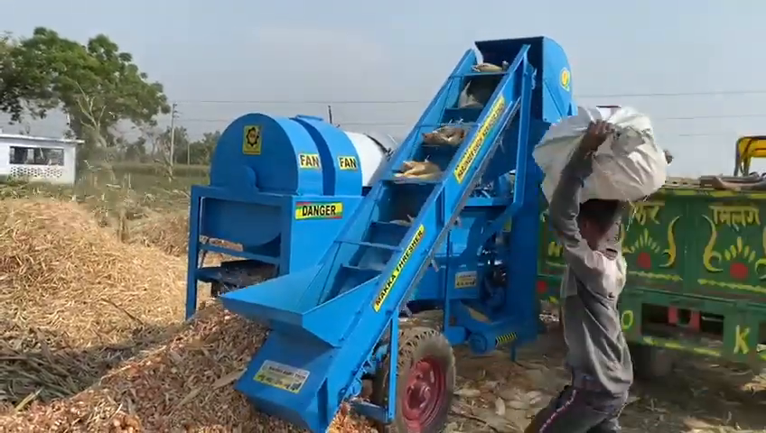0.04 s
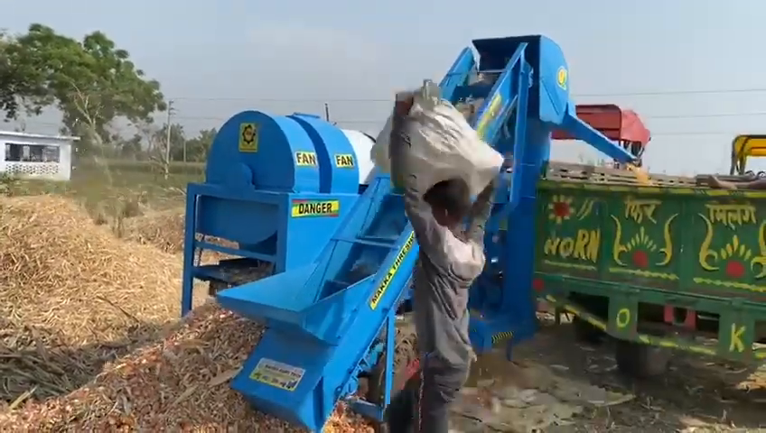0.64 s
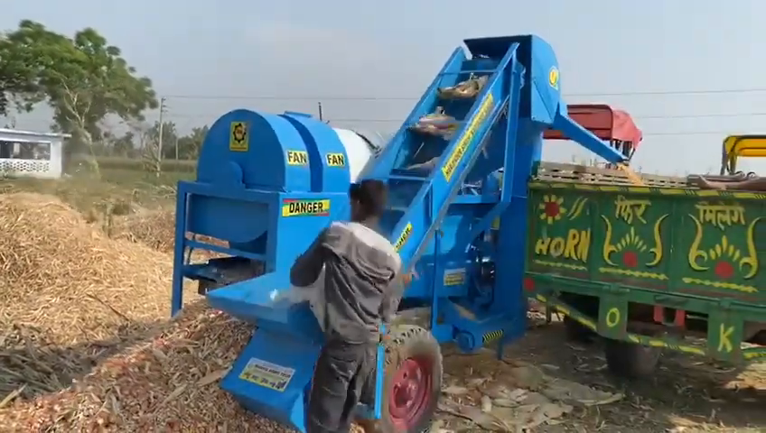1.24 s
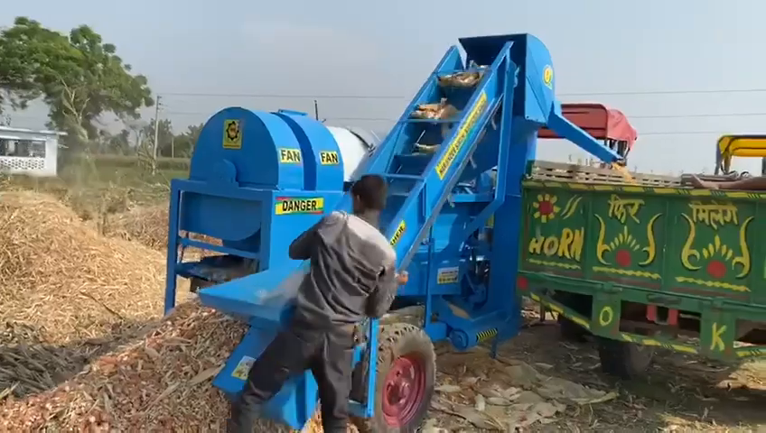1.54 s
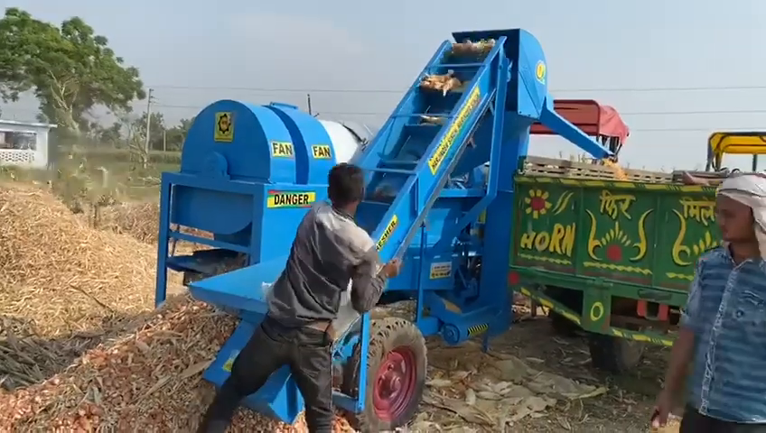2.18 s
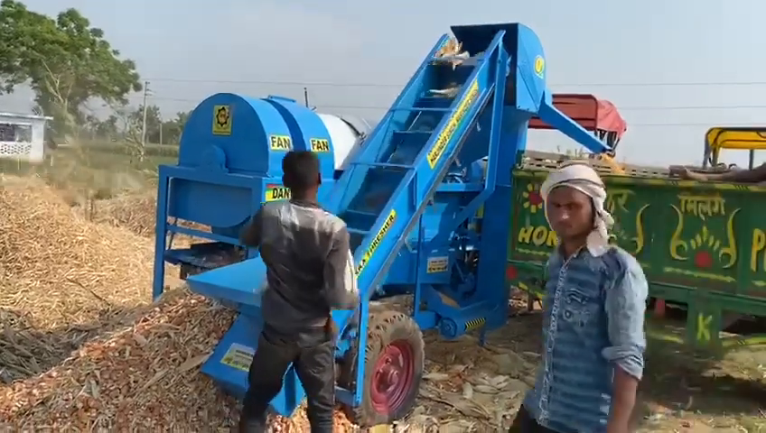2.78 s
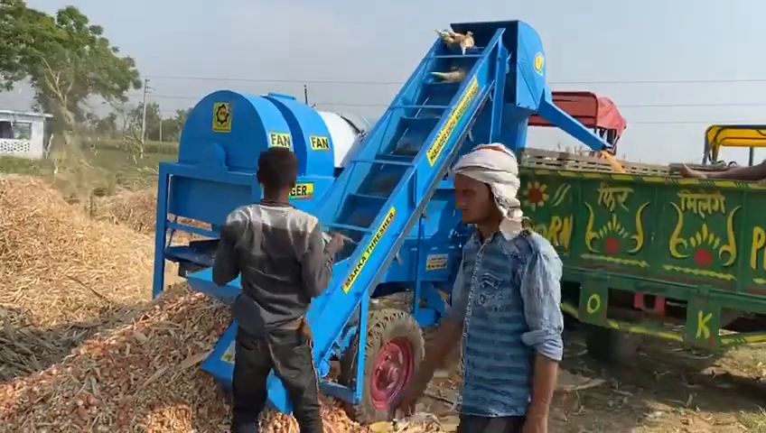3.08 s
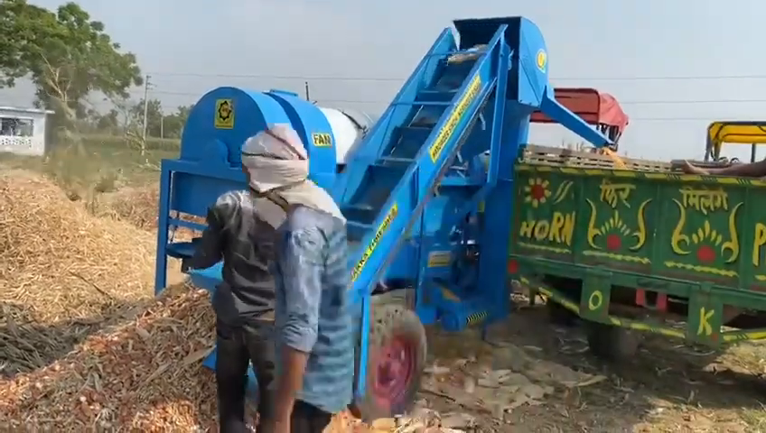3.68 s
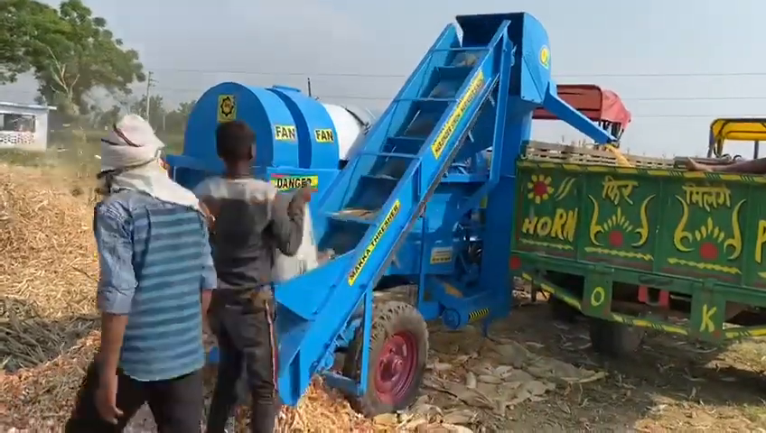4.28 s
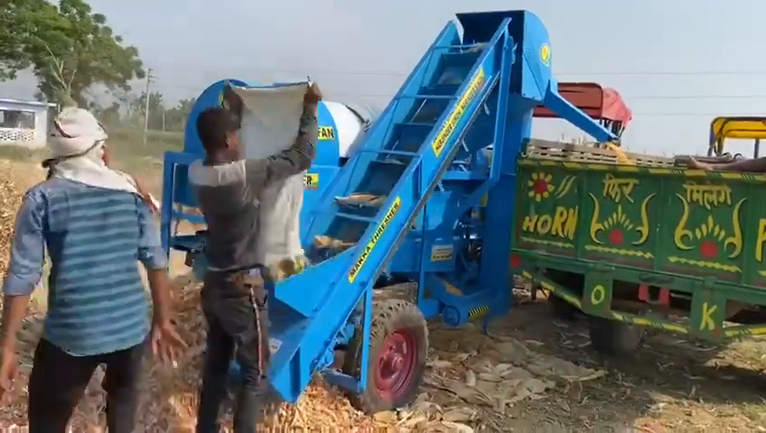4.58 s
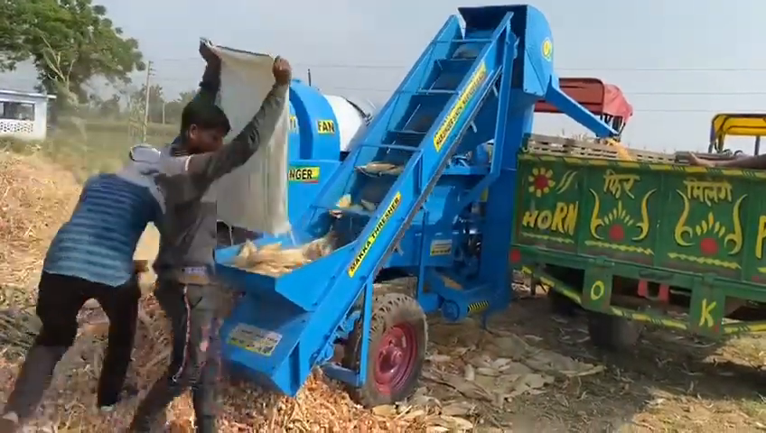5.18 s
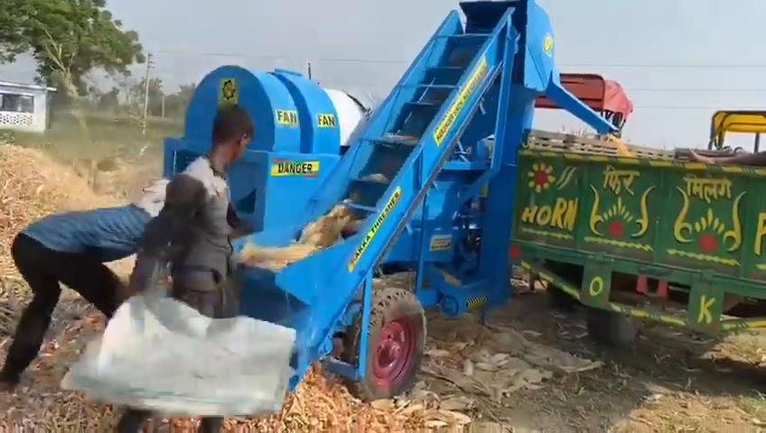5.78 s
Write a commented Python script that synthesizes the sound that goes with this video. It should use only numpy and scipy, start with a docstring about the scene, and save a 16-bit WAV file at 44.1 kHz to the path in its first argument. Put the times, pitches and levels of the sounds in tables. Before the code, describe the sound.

A tractor-driven maize thresher runs loudly and steadily in an open farmyard. Its drum rumbles and throbs over a diesel hum while the fan rushes and drones. Cobs batter the steel casing and kernels hail on the sieves. About a second in, cobs tumble from a sack into the metal hopper. Scattered faint knocks and short dry rustles of sacking and husks come through the roar, which never lets up.

```python
"""A roar with a low throb and a patter of grain: a tractor-driven maize thresher in an open farmyard.
Cobs, tipped in from a sack, batter and ring the sheet-steel casing while the cleaning fan rushes and drones.
The drum rumbles and throbs over the engine's hum.
Loose kernels hail on the sieves among husks, with short dry rustles, mostly of woven sacking."""
import sys
import numpy as np
from scipy import signal
from scipy.fft import rfft, irfft, next_fast_len
from scipy.io import wavfile
from scipy.ndimage import uniform_filter1d, map_coordinates

SR = 44100
rng = np.random.default_rng(int(sys.argv[2]) if len(sys.argv) > 2 else 0)


def generate_wav(signal):
    """Clip the signal to [-1, 1] and save it as 16-bit WAV at the path in sys.argv[1]."""
    frames = np.transpose(np.atleast_2d(signal))
    scaled = np.clip(frames, -1, 1) * 32767
    pcm = np.round(scaled).astype(np.int16)
    wavfile.write(sys.argv[1], SR, pcm)


N = 261513

# modes of the drum's steel wall: (frequency [Hz], level [dB], t60 [s])
WALL_MODES = [(794, -4, 0.17), (853, -1.5, 0.069), (944, -6, 0.12), (1271, -6, 0.13), (1339, -5, 0.16),
              (1575, -10.5, 0.064), (2027, -12, 0.23), (2526, -13, 0.19)]
# kernels on steel: (frequency [Hz], spectral level [dB])
KERNEL_SPECTRUM = [(600, -53), (1800, 1.5), (2900, -2), (3600, -3.5), (4500, 1.5), (5100, 0), (5600, -11),
                   (6400, -6.5), (7400, -3.5), (8500, -3.5), (9700, -5.5), (11300, -9.5), (12000, -26)]
LOAD_SLOPE = 0.5  # dB of fan, clatter and rattle per dB of load


def cobs(load_db, level_db=-24.5):
    """Cobs flung off the drum ring the casing panels, harder as the load grows."""
    # panel modes: (frequency [Hz], width [Hz], level [dB])
    casing_modes = [(135, 24, -12), (195.8, 23, -2), (246.5, 17.7, 0), (267.3, 16.7, 1), (288, 19, -1.5),
                    (350, 53, -0.5), (384.7, 31, -0.3), (456, 37, -10), (539.5, 60, -7), (674, 84, -6.5),
                    (1306, 180, -14.5), (1800, 610, -22.5)]
    batter = spread(impacts(per_second=1800, scatter_db=4), resonances(casing_modes))
    return amp(level_db + load_db) * steadied(batter, evenness=0.55)


def fan(load_db, level_db=-22.5, flutter_db=0.67):
    """The cleaning fan blows chaff out in a turbulent stream."""
    # (frequency [Hz], spectral level [dB])
    air_spectrum = [(30, -42), (100, -6), (150, -3.5), (370, -0.5), (550, -3.5), (850, -1.5), (1000, -2.2),
                    (1140, -6), (1330, -7), (1520, -8.5), (2000, -12), (2500, -18), (4000, -18),
                    (12000, -46.5)]
    gain = amp(level_db + LOAD_SLOPE * load_db + flutter_db * wobble(22))
    return gain * rush(air_spectrum, patchy_db=1.27)


def drum(level_db=-30):
    """The spinning drum keeps the air in its housing booming."""
    # (frequency [Hz], spectral level [dB])
    boom_spectrum = [(20, -24), (34, -22), (48, -8), (62, -11), (72, 0.5), (81, 1.5), (90, 6), (102, -4),
                     (125, -3), (170, -21), (300, -56), (600, -90)]
    return amp(level_db) * steadied(rush(boom_spectrum, patchy_db=3), evenness=1, window=SR // 12)


def throbs(level_db=-1.8, pitch_hz=84, detune=0.1):
    """Low throbs in the rumble, a few cycles each near pitch_hz."""
    # (time [s], level [dB], half length [s])
    swells = [(0.127, -16, 0.023), (0.45, -14, 0.033), (0.618, -20, 0.033), (0.76, -22, 0.054),
              (0.88, -13.5, 0.03), (1, -16, 0.027), (1.186, -18, 0.035), (1.336, -17.5, 0.064),
              (1.533, -16, 0.048), (1.847, -18.5, 0.1), (1.996, -19, .03), (2.231, -17, 0.015),
              (2.424, -16, 0.039), (2.696, -24, 0.053), (3.183, -18, .03), (3.283, -16, .05),
              (3.533, -23, .04), (3.76, -18, 0.021), (4.125, -20.5, 0.043), (4.22, -21, .04),
              (4.348, -18, 0.027), (4.425, -13, 0.03), (4.517, -17.5, 0.041), (4.61, -17, .04),
              (4.86, -18, 0.039), (5.094, -17, 0.034), (5.22, -15, 0.04), (5.356, -28, .04),
              (5.513, -16, 0.029), (5.677, -16, .035), (5.818, -17, 0.029)]
    out, t = np.zeros(N), np.arange(N) / SR
    for time_s, db, half_s in swells:
        offset, phase = rng.uniform(-1, 1, 2)
        tone = np.sin(2 * np.pi * (pitch_hz * (1 + detune * offset) * t + phase))
        out += amp(db + level_db) * swell_at(time_s, half_s) * tone
    return out


def knocks(attack_s=0.0015, ring_octaves=0.7, crack_db=-0.5, crack_t60_s=0.09, crack_octaves=0.4):
    """Single hard cobs crack against the drum wall; the spot hit decides which modes ring."""
    # (time [s], level [dB], band centre [Hz])
    blows = [(1.049, -27, 1700), (1.126, -22, 1400), (1.452, -28, 1400), (1.515, -26, 2100),
             (2.102, -18.5, 1590), (3.07, -23, 1290), (3.356, -21, 1800), (3.737, -22, 1500),
             (3.95, -20, 1500), (4.083, -21, 1900), (4.391, -19, 1600), (5.727, -19.5, 1500),
             (5.748, -23, 2080)]
    out, t = np.zeros(N + SR), np.arange(SR // 4) / SR
    bins_hz = np.fft.rfftfreq(len(t), 1 / SR) + 1
    onset = 1 - np.exp(-t / attack_s)
    for time_s, db, centre_hz in blows:
        ring = np.zeros(len(t))
        for hz, mode_db, t60_s in WALL_MODES:
            weight = np.exp(-(np.log2(hz / centre_hz) / ring_octaves) ** 2)
            decay = amp(mode_db + rng.normal(0, 1.1) - 60 * t / t60_s)
            ring += weight * decay * np.sin(2 * np.pi * (hz * t + rng.random()))
        band = np.exp(-(np.log2(bins_hz / centre_hz) / crack_octaves) ** 2)
        noise = unit(irfft(rfft(rng.standard_normal(len(t))) * band, len(t)))
        crack = noise * amp(crack_db - 60 * t / crack_t60_s)
        out[round(time_s * SR):][:len(t)] += amp(db) * (ring + crack) * onset
    return out[:N]


def pour():
    """Cobs tipped from a sack drum on the steel hopper in surges."""
    # (time [s], level [dB], half length [s])
    surges = [(0.74, -24, 0.055), (0.884, -26.5, 0.12), (1.079, -19.5, 0.033), (1.167, -21, 0.048)]
    # (frequency [Hz], width [Hz], level [dB])
    hopper_modes = [(126, 45, 2.5), (197, 29, 4.5), (288, 97, 8), (393, 98, 3.5), (930, 53, -6)]
    flow = sum(amp(db) * swell_at(time_s, half_s) for time_s, db, half_s in surges)
    ring = spread(impacts(per_second=900, scatter_db=8), resonances(hopper_modes))
    return flow * steadied(ring, evenness=0.6)


def clatter(load_db, level_db=-32, per_second=32, detune=0.022, tilt_db_per_octave=-7):
    """Lighter cobs tumble against the drum wall, each ringing it a little differently."""
    out, t = np.zeros(N + SR), np.arange(SR // 5) / SR
    hz, mode_db, t60_s = np.transpose(WALL_MODES)[:, :, None]
    tilted_db = mode_db + tilt_db_per_octave * np.log2(hz / 1000)
    for when, strength in rng.random((int(per_second * N / SR), 2)):
        excitation, offset, phase = rng.uniform(-0.96, 1, (3, len(WALL_MODES), 1))
        scatter_db = 4 * excitation + 3 * (2 * strength - 1)
        decay = amp(tilted_db + scatter_db - 60 * t / t60_s)
        modes = decay * np.sin(2 * np.pi * (hz * (1 + detune * offset) * t + phase))
        out[int(when * N):][:len(t)] += modes.sum(axis=0)
    return amp(level_db + LOAD_SLOPE * load_db) * unit(out[:N])


def rattle(load_db, level_db=-32):
    """Broken cobs rap on the threshing bars in very short rings."""
    raps = taps(per_second=300, centre_hz=1250, octaves=0.88, t60_s=0.016,
                scatter_db=4, rolloff=0.5, samples=SR // 32)
    return amp(level_db + LOAD_SLOPE * load_db) * raps


def engine(cycle_hz=11.1, drift=0.00397, flutter_db=2, level_db=-1):
    """The diesel and its drive hum on orders of a wavering cycle rate, two shaft turns a cycle."""
    # (order [x cycle rate], level [dB])
    orders = [(3.5, -56), (4, -52), (7, -31), (8, -35.5), (10, -36.5), (14, -45.5), (18, -37.5),
              (26, -39.5)]
    cycles = np.cumsum(cycle_hz * (1 + drift * wobble(3.01))) / SR
    hum = np.zeros(N)
    for order, db in orders:
        hum += amp(db + flutter_db * wobble(7.6)) * np.sin(2 * np.pi * (order * cycles + rng.random()))
    return amp(level_db) * np.sqrt(2) * hum


def fan_drone(wander=0.01201):
    """The air stream keeps the fan housing ringing, its pitch wandering a little."""
    # (frequency [Hz], width [Hz], level [dB])
    housing_modes = [(740.4, 22, 0), (800, 26, -1), (868, 34, 0.5), (944, 30, 0), (1010, 42, -4)]
    # (time [s], level [dB])
    drone_levels = [(0, -33), (0.22, -28), (0.55, -27.5), (0.83, -26), (1.0, -33), (1.3, -31), (1.7, -39),
                    (2.0, -34), (2.55, -34), (3.1, -30.5), (4.15, -31), (4.6, -34.5), (5.2, -30),
                    (5.5, -32.5), (5.93, -27)]
    ring = spread(rng.standard_normal((2, N)), resonances(housing_modes))
    clock = np.cumsum(1 + wander * wobble(6))
    ring = np.array([map_coordinates(side, [clock], order=1, mode="mirror") for side in ring])
    return amp(curve(drone_levels)) * steadied(ring, evenness=0.8)


def kernels(patter_db, level_db=-0.44, clump_db=1.75):
    """Kernels hail on the ringing sieves in clumps."""
    hits = sheet_ring(impacts(per_second=6000, scatter_db=3), t60_s=0.086, ring_db=-3)
    gain = amp(patter_db + level_db + clump_db * wobble(38))
    return gain * spread(hits, lambda hz: amp(along(KERNEL_SPECTRUM, hz)))


def sheet_ring(hits, t60_s, ring_db, block=4096):
    """Blows leave a short ring in sheet steel; the spot hit, and so the ring, keeps changing."""
    decay = amp(-60 * np.arange(block) / SR / t60_s)
    ring = np.zeros((2, N + 2 * block))
    for start in range(0, N, block):
        tail = rng.standard_normal((2, block)) * decay
        part = signal.fftconvolve(hits[:, start:start + block], tail / np.linalg.norm(tail[0]), axes=1)
        ring[:, start:start + part.shape[1]] += part
    return hits + amp(ring_db) * ring[:, :N]


def rustles(level_db=-0.5):
    """Short dry rustles of sacking, husks and grain, each with its own brightness."""
    # (time [s], level [dB], half length [s], tilt [dB/octave])
    bursts = [(0.09, -30, 0.04, 0), (0.822, -31, 0.028, 4), (0.918, -28.5, 0.049, -3),
              (1.048, -29, 0.023, 7), (1.08, -30, 0.051, -5), (1.14, -31, 0.037, 4), (1.655, -31, 0.015, 0),
              (1.91, -35, 0.059, 3), (3.44, -28, 0.033, 3), (4.758, -30, .03, -4), (5.308, -25.5, 0.046, 1)]
    crackle = impacts(per_second=4000, scatter_db=3.5)
    out = np.zeros((2, N))
    for time_s, db, half_s, tilt in bursts:
        rustle = spread(crackle,
                        lambda hz: amp(along(KERNEL_SPECTRUM, hz) + tilt * np.log2((hz + 1) / 5000)))
        out += amp(db + level_db) * swell_at(time_s, half_s) * rustle
    return out


def husks(patter_db, level_db=-6, flutter_db=2):
    """Dry husks rustle through the machine with the grain."""
    rustle = rush(KERNEL_SPECTRUM, patchy_db=2.2)
    return amp(patter_db + level_db + flutter_db * wobble(45)) * rustle


def pings(patter_db, level_db=-8):
    """Single kernels stand out of the hail, each pinging the steel at its own pitch."""
    rings = taps(per_second=130, centre_hz=3000, octaves=0.75, t60_s=0.065,
                 scatter_db=2, rolloff=1, samples=SR // 16)
    return amp(patter_db + level_db) * rings


def panel_hum(pitch_hz=374, width_hz=42):
    """A loose casing panel hums roughly, on and off, as the machine shakes."""
    # (time [s], level [dB])
    hum_levels = [(0, -26.5), (0.14, -36), (0.42, -40), (0.52, -27), (0.68, -36), (1.15, -30), (1.4, -40),
                  (5.93, -54)]
    mode = resonances([(pitch_hz, width_hz, 0)])
    hum = spread(rng.standard_normal((2, N)), lambda hz: mode(hz) ** 2)
    return amp(curve(hum_levels)) * steadied(hum, evenness=0.8)


def impacts(per_second, scatter_db):
    """Two trains of randomly timed blows of uneven strength."""
    struck = rng.random((2, N)) < per_second / SR
    size = amp(scatter_db * np.clip(rng.standard_normal((2, N)), -2, 2))
    return struck * size * rng.choice([-1, 1], (2, N))


def taps(per_second, centre_hz, octaves, t60_s, scatter_db, rolloff, samples):
    """Damped sines of random time, pitch and pan, weaker at higher pitch; rms 1."""
    out, t = np.zeros((2, N + SR)), np.arange(samples) / SR
    for when, pitch, strength, pan in rng.random((int(per_second * N / SR), 4)):
        hz = centre_hz * 2 ** (octaves * (2 * pitch - 1))
        decay = amp(scatter_db * (2 * strength - 1) - 60 * t / t60_s)
        ring = decay * np.sin(2 * np.pi * hz * t) * (centre_hz / hz) ** rolloff
        out[:, int(when * N):][:, :samples] += np.outer(np.sqrt([pan, 1 - pan]), ring)
    return unit(out[:, :N])


def rush(spectrum, patchy_db):
    """Stereo turbulence with random gain patches in time and frequency; rms 1."""
    cells = signal.stft(rng.standard_normal((2, N)), nperseg=512)[2]
    patches = uniform_filter1d(rng.standard_normal(cells.shape[1:]), size=5, axis=0)
    patches = uniform_filter1d(patches, size=12, axis=1)
    pair = signal.istft(cells * amp(patchy_db * unit(patches)), nperseg=512)[1][:, :N]
    return spread(pair, lambda hz: amp(along(spectrum, hz)))


def resonances(modes):
    """Frequency response of a body: band-pass modes of alternating sign."""
    return lambda hz: sum(
        (-1) ** k * amp(db) * 1j * hz * width / (centre ** 2 - hz ** 2 + 1j * hz * width)
        for k, (centre, width, db) in enumerate(modes))


def spread(pair, response):
    """Colour two unrelated signals and mix to stereo, bass near mono, treble wider; rms 1."""
    # (frequency [Hz], left-right coherence [0..1])
    coherence = [(60, 1), (250, 0.97), (570, 0.9), (1200, 0.7), (2600, 0.87), (3800, 0.58), (5500, 0.61),
                 (6500, 0.82), (7700, 0.6), (8300, 1), (9500, 0.56), (10200, 1)]

    def shares(hz):
        angle = np.arccos(np.clip(along(coherence, hz), -1, 1)) / 2
        return response(hz) * np.array([np.cos(angle), np.sin(angle)])
    mid, side = filtered(pair, shares)
    return unit(np.array([mid + side, mid - side]))


def steadied(ring, evenness, window=SR // 20):
    """Even out the chance swells of a continuously fed ring; rms 1."""
    power = uniform_filter1d(np.mean(ring ** 2, axis=0), size=window)
    swell = np.sqrt(np.abs(power) + 1e-6)
    return unit(ring / swell ** evenness)


def filtered(x, response):
    """Apply a complex frequency response."""
    size = next_fast_len(N + SR // 2)
    return irfft(rfft(x, size) * response(np.fft.rfftfreq(size, 1 / SR)), size)[..., :N]


def swell_at(time_s, half_s):
    """Bell-shaped envelope."""
    return np.exp(-2 * ((np.arange(N) / SR - time_s) / half_s) ** 2)


def wobble(rate_hz):
    """Smooth random curve, rate_hz knots a second."""
    return map_coordinates(rng.standard_normal(2048), [np.arange(N) * rate_hz / SR + 2], mode="wrap")


def curve(points):
    """Interpolate (time [s], value) points per sample."""
    return np.interp(np.arange(N) / SR, *np.transpose(points))


def along(points, hz):
    """Interpolate (frequency [Hz], value) points on a log axis."""
    knots_hz, values = np.transpose(points)
    return np.interp(np.log(hz + 1), np.log(knots_hz + 1), values)


def amp(db):
    """Decibels to gain."""
    return 10 ** (np.asarray(db) / 20)


def unit(x):
    """Scale to rms 1."""
    return x / np.sqrt(np.mean(x ** 2) + 1e-20)


def scene():
    """Load drives cobs and fan; grain flow drives kernels and husks."""
    # machine load: (time [s], level [dB])
    load_levels = [(0, -20.5), (0.18, -23), (0.5, -22.5), (0.8, -21.5), (1.12, -21.5), (1.38, -22.5),
                   (1.53, -21), (1.69, -23), (1.97, -19.5), (2.22, -23), (2.9, -23), (3.27, -21),
                   (3.7, -22.5), (4.15, -21.5), (4.95, -21), (5.18, -23), (5.36, -19.5), (5.93, -22)]
    # grain reaching the sieves: (time [s], level [dB])
    grain_levels = [(0, -32.5), (0.2, -36), (0.6, -35.5), (0.98, -32), (1.35, -34), (1.7, -34),
                    (1.95, -31.5), (2.4, -33.5), (3.1, -34), (3.9, -33), (4.75, -32.5), (5.15, -33.5),
                    (5.55, -33), (5.93, -33.5)]
    load_db, patter_db = curve(load_levels), curve(grain_levels)
    load_db -= load_db.mean()
    threshing = cobs(load_db) + clatter(load_db) + rattle(load_db) + pour() + knocks() + throbs()
    treble = kernels(patter_db) + pings(patter_db) + rustles() + husks(patter_db)
    return engine() + drum() + fan(load_db) + fan_drone() + panel_hum() + threshing + treble


def record(dry, top_hz=11850):
    """Give each side its own gain and phase, then cut the treble above top_hz."""
    # (frequency [Hz], left minus right [dB])
    balance = [(60, -5.5), (110, 0), (190, -3.5), (350, 0), (630, -2), (1120, 1), (2020, 0.0), (3620, -0.5),
               (6510, 0.5), (11700, 0)]
    # (frequency [Hz], left phase lead [rad])
    phase_lead = [(300, 0), (780, .3), (1640, -.3), (3700, .8), (5200, .5), (6100, -.1), (7000, 0),
                  (7500, -.6), (8000, -3.1), (8900, -3.3), (9550, -4.5), (10000, -6.28)]

    def sides(hz):
        gain = amp(np.outer([0.5, -0.5], along(balance, hz)))
        phase_rad = np.outer([0.5, -0.5], along(phase_lead, hz))
        return gain * np.exp(1j * phase_rad)
    return filtered(filtered(dry, sides), lambda hz: hz < top_hz)


dry = scene()
out = record(dry)
generate_wav(out)
```